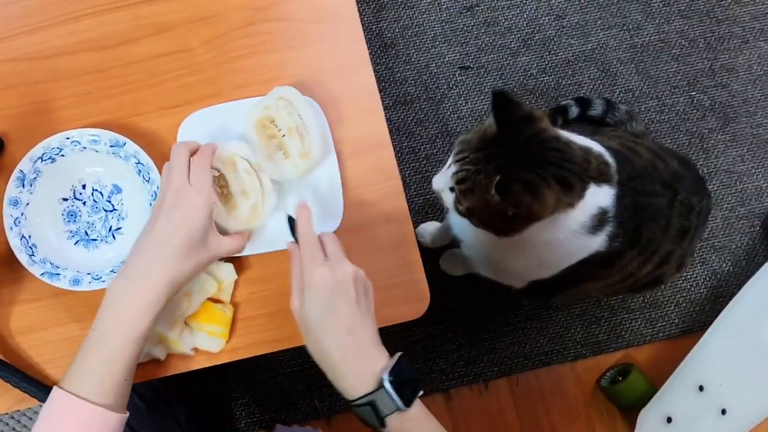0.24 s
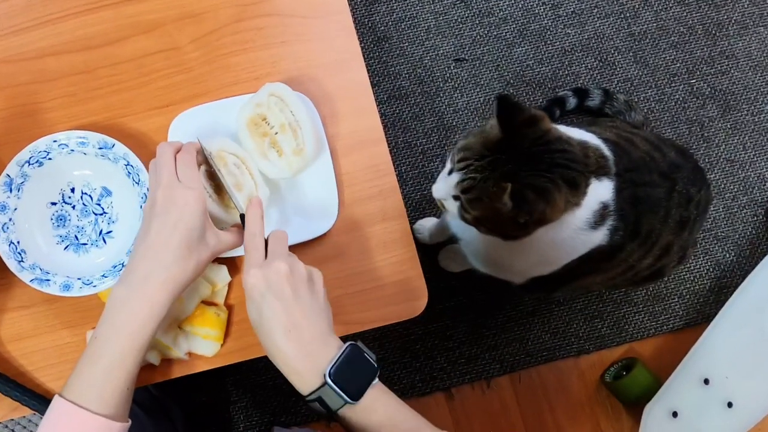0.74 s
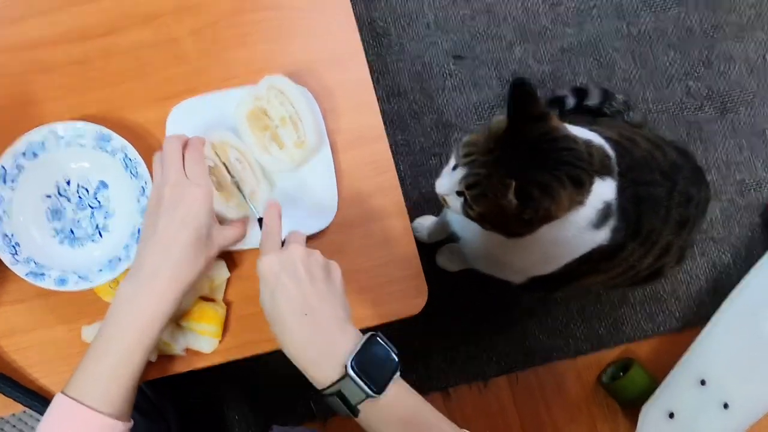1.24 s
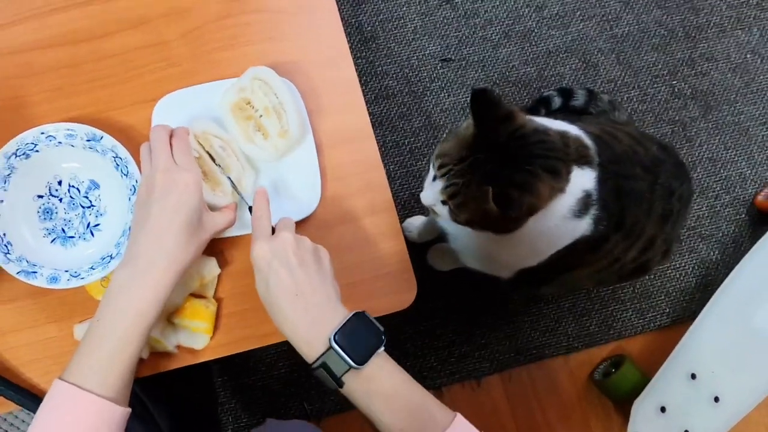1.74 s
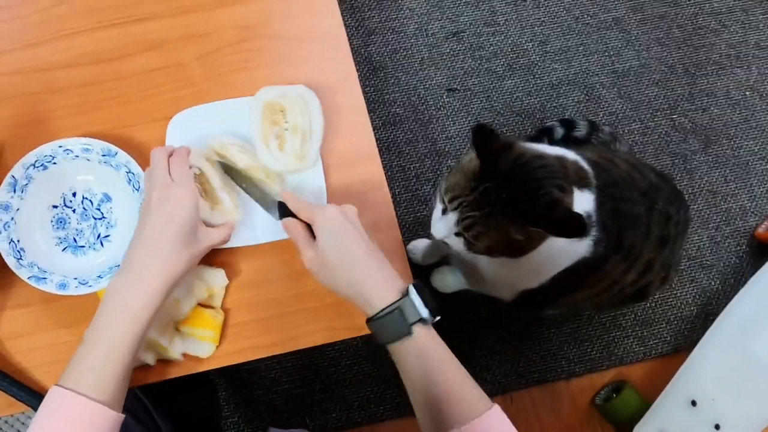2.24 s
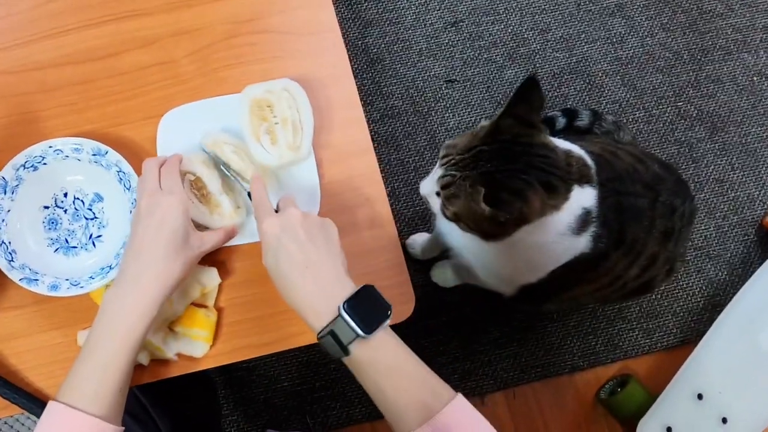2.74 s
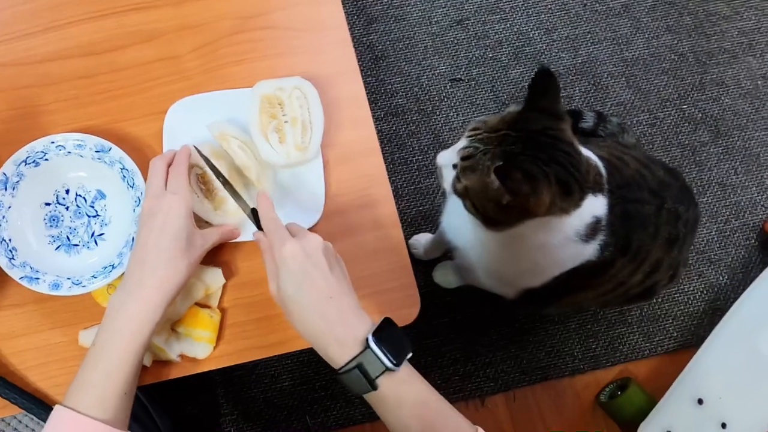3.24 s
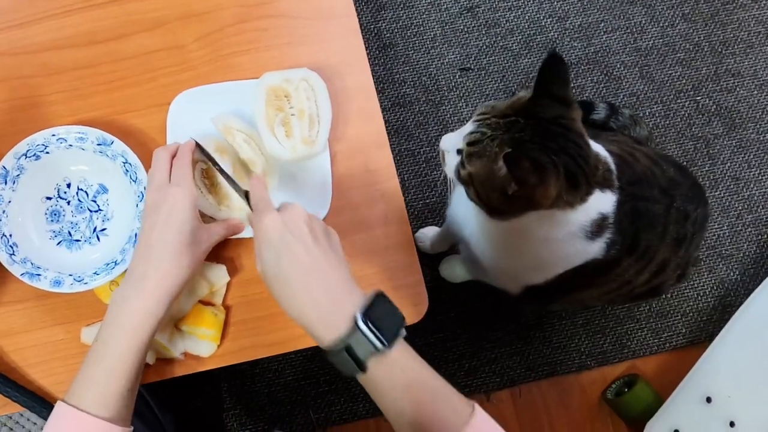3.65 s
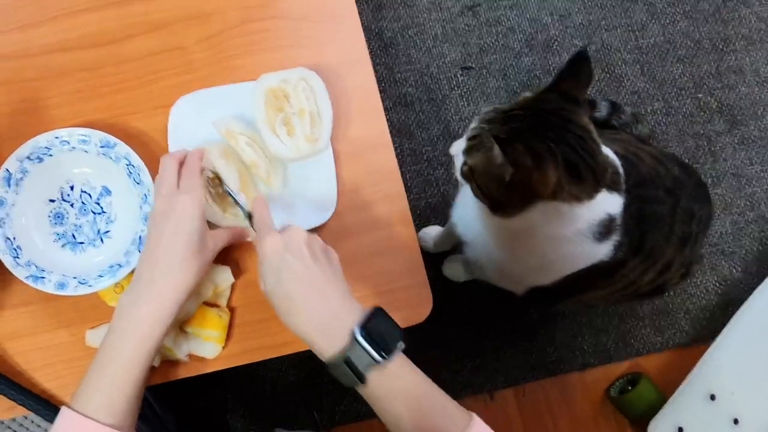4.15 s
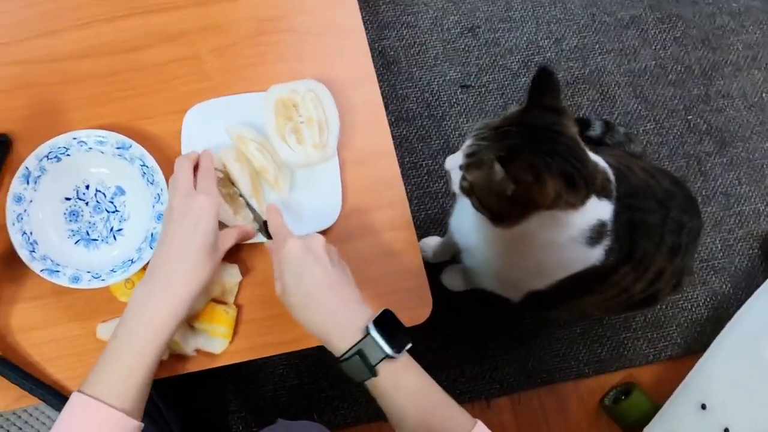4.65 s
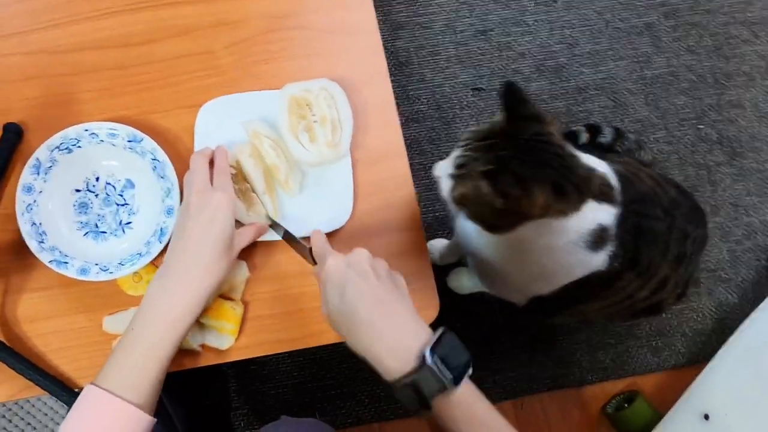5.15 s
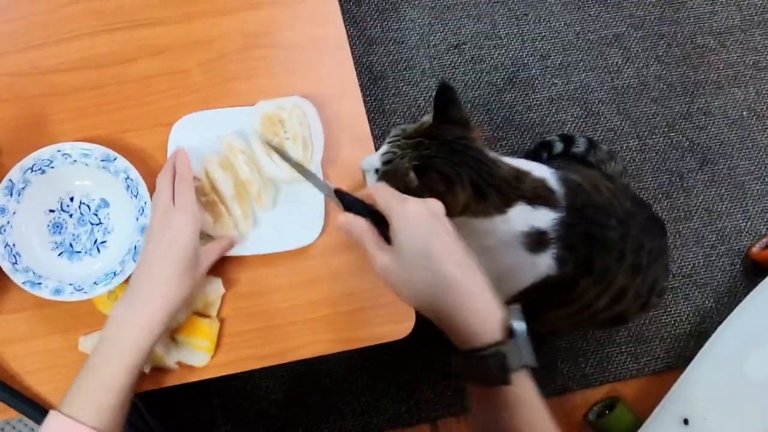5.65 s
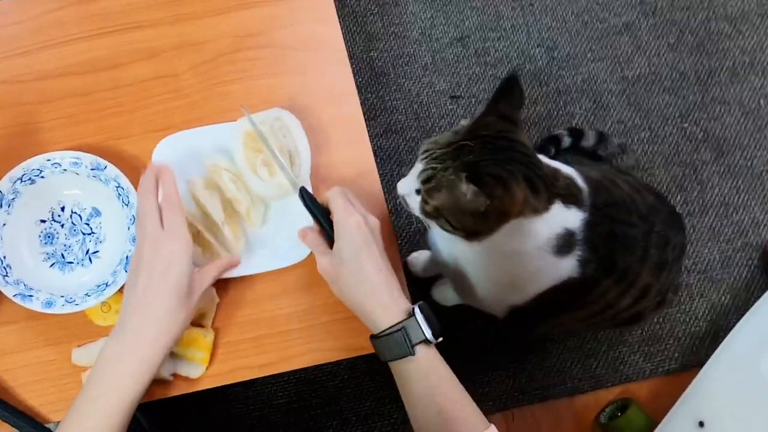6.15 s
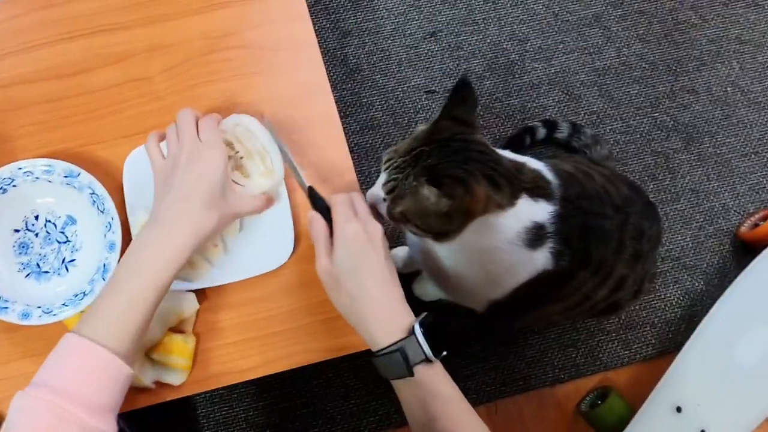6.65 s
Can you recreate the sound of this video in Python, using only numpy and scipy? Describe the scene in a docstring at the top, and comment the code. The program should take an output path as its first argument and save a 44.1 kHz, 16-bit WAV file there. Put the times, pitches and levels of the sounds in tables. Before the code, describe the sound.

A knife crunches wetly through crisp melon on a ceramic plate in a small living room, with sharp knocks, dull thuds and a final plate scrape.

```python
"""Over a faint room rumble, soft thuds on a ceramic plate, then a knife slicing a melon in a small living room.
The blade crackles through crisp flesh (random clicks ringing its resonances, with hiss), the flesh ticks wetly,
and the edge knocks on the plate (shaped noise, plate modes, short clinks); slices fall, slide and rock, and the
plate thuds on the wooden table (soft blows). Last, it is nudged round: stick-slip clicks and a thin squeal.
A phone above the table hears all this in stereo, with a short diffuse room tail."""
import sys
import numpy as np
from scipy import signal
from scipy.fft import rfft, irfft
from scipy.io import wavfile
from scipy.ndimage import uniform_filter1d

SR = 44100
rng = np.random.default_rng(int(sys.argv[2]) if len(sys.argv) > 2 else 0)


def int16_out(signal):
    """Quantize to a 16-bit WAV file."""
    q = np.round(np.clip(np.atleast_2d(signal).T, -1, 1) * 32767)
    wavfile.write(sys.argv[1], SR, q.astype(np.int16))


N = 303840
T = np.arange(N) / SR

# Dull, wet spectrum of soft thuds and of the cutting's body. Each row: frequency in Hz, level in dB.
FLESH_SPECTRUM = [(70, -23.5), (150, 0.5), (190, -5.5), (280, 3.5), (325, -3), (370, 7.5), (520, -7.5),
                  (1000, -2), (1450, -0.5), (2200, -8), (4000, -41)]


def amp(db):
    """Decibels to gain."""
    return 10 ** (np.asarray(db) / 20)


def unit(x):
    """Scale to rms 1."""
    return x / np.sqrt(np.mean(x ** 2) + 1e-20)


def unit_attack(x):
    """Scale a hit to rms 1 over its first 12 ms."""
    return x / np.sqrt(np.mean(x[:int(.012 * SR)] ** 2))


def on_log_axis(hz, points):
    """Read (Hz, value) points on a logarithmic frequency axis."""
    f, v = np.transpose(points)
    return np.interp(np.log(np.maximum(hz, 1)), np.log(f), v)


def colour(x, points, size=2048):
    """Minimum-phase filter with the given (Hz, dB) spectrum, by folding its cepstrum."""
    level_db = on_log_axis(np.fft.rfftfreq(size, 1 / SR), points)
    cepstrum = irfft(np.log(amp(level_db)))
    cepstrum[1:size // 2] *= 2
    cepstrum[size // 2 + 1:] = 0
    impulse = irfft(np.exp(rfft(cepstrum)))
    return signal.fftconvolve(x, impulse)[:len(x)]


def band(x, lo_hz, hi_hz, order=3):
    """Butterworth band-pass."""
    edges_hz = [lo_hz, min(hi_hz, .49 * SR)]
    return signal.sosfilt(signal.butter(order, edges_hz, "band", fs=SR, output="sos"), x)


def even(x, bins=160):
    """Level out the broad humps in the spectrum of a short burst."""
    spectrum = rfft(x)
    return irfft(spectrum / np.sqrt(uniform_filter1d(np.abs(spectrum) ** 2, bins)), len(x))


def add(track, start_s, x):
    """Mix a sound in at a start time."""
    i = int(start_s * SR)
    track[i:i + len(x)] += x[:N - i]


def flicker(per_s, depth_db):
    """Gain wandering between random dB values, per_s of them a second, depth_db their standard deviation."""
    steps = rng.standard_normal(N // 50)
    return amp(depth_db * np.interp(T * per_s, np.arange(len(steps)), steps))


def grains(per_s, spread_db):
    """Random one-sample clicks of either sign and very unequal size."""
    sizes = amp(spread_db * np.minimum(rng.exponential(size=N), 4))
    present = rng.random(N) < per_s / SR
    return present * sizes * rng.choice([-1, 1], N)


def gesture(start_s, length_s, swell_db, attack_db_per_s, release_db_per_s):
    """Gain of one movement: it sets in, swells or eases while it lasts, and dies away."""
    progress = np.clip((T - start_s) / length_s, 0, 1)
    early_s = np.maximum(start_s - T, 0)
    late_s = np.maximum(T - start_s - length_s, 0)
    level_db = swell_db * (progress - .5) - attack_db_per_s * early_s - release_db_per_s * late_s
    return amp(np.maximum(level_db, -120))


def ring(t, damping, scatter_db):
    """Decaying modes of plate and table top, detuned and rescaled at random for each contact."""
    # Each row: nominal frequency in Hz, mean level in dB, t60 in s at damping 1.
    modes = [(163.8, -17, 0.23), (238, -11.5, 0.48), (291, 0, 0.23), (376, -8.5, 0.096), (379.4, 2, 0.24),
             (483, -12.5, 0.43), (602, -10.5, 0.26), (617, -11, 0.1), (664, -13.5, 0.29), (775, -9, 0.35),
             (899, -4, 0.23), (1017, -4.5, 0.26), (1078, -11, 0.1), (1205, -3, 0.16), (1340, -12, 0.044),
             (1910, -7, 0.095), (2160, -4.5, 0.048), (2560, -6, .04), (2990, -7, 0.14), (3620, -4, 0.035),
             (4000, -7, 0.022), (4780, -8, 0.092), (7050, -12, 0.067)]
    hz, db, t60_s = np.transpose(modes)[:, :, None]
    size, detune, phase = rng.standard_normal((3, len(modes), 1))
    decay = np.exp(-np.log(1000) * t * damping / t60_s)
    tones = np.sin(2 * np.pi * hz * (1 + 0.015 * detune) * t + .5 * phase)
    return np.sum(amp(db + scatter_db * size) * decay * tones, axis=0)


def rumble():
    """Low, steady noise of the home; its bass wavers and is nearly alike at both ports."""
    # Each row: frequency in Hz, level in dB.
    spectrum = [(20, -16), (40, -9.5), (47, -3.5), (56, 2), (65, -6.5), (80, -22.5), (118, -14),
                (200, -15.5), (250, -16.5), (290, -11), (335, -21.5), (800, -28.5), (1300, -25),
                (2200, -38), (4500, -44.5), (7500, -48), (15000, -71)]
    mid, side = (unit(colour(rng.standard_normal(N), spectrum, size=16384)) for _ in range(2))
    side = colour(side, [(100, -15), (400, -10), (1500, -5), (5000, -2)])
    both = mid + side * np.array([[1], [-1]])
    bass = signal.sosfiltfilt(signal.butter(2, 150, fs=SR, output="sos"), both)
    wavering = bass * flicker(per_s=17, depth_db=0.7) + (both - bass) * flicker(per_s=6, depth_db=0.85)
    balance_db = np.array([[-.5], [.5]])
    return amp(-63.5) * wavering * amp(balance_db)


def soft_thuds():
    """Soft blows push for longer, so mostly low modes answer; repeated blows come ever duller and softer."""
    # Soft thuds: fruit landing on the plate, or the plate pushed against the table under the knife.
    # Each row: start in s, first peak in dB, first brightness in dB, number of blows.
    thuds = [(0.179, -47.5, -10, 1), (0.1957, -36.5, -4.5, 1), (0.2133, -34, -16.5, 2),
             (0.285, -50.5, -9, 1), (2.1107, -28.5, 7, 6), (2.769, -30, -4.5, 1), (4.024, -23.5, 2.5, 1),
             (4.407, -35.5, -1.5, 1), (5.131, -28.5, -19, 1), (5.167, -36, -14, 1), (5.2139, -40.5, -27, 1),
             (5.432, -43.5, -23, 1), (5.546, -53.5, -32, 1), (5.744, -46.5, -13, 2), (5.988, -39.5, -13, 1)]
    gap_s, settle_db, dulling_db_per_blow = .0192, 16.5, 7
    out = np.zeros(N)
    t = np.arange(SR // 4) / SR
    for start_s, peak_db, first_bright_db, blows in thuds:
        for k in range(round(blows)):
            bright_db = first_bright_db - dulling_db_per_blow * k
            settled = (k / round(blows)) ** 3
            slap = colour(rng.standard_normal(len(t)) * np.exp(-t / .011), FLESH_SPECTRUM)
            blow = ring(t, damping=1.6, scatter_db=4.0) + amp(18) * slap
            blow = colour(blow, [(100, -10), (290, 8.5), (700, bright_db + 5), (1400, bright_db + 4.5),
                                 (2600, bright_db - 12.5), (8000, bright_db - 20.5)])
            blow = blow / np.abs(blow).max()
            add(out, start_s + k * gap_s, blow * amp(peak_db - settle_db * settled))
    return out


def effort():
    """Gains of crunch, fizz and body: the powers of all movements and bites summed."""
    # Blade through flesh, or a cut slice falling or sliding. Each row: start in s, length in s,
    # crunch in dB, swell over the movement in dB, fizz in dB re crunch, body in dB re crunch.
    movements = [(0.66, .06, -74.5, -8, -3.5, -24), (0.914, .125, -48.5, -13, -9.5, -11),
                 (1.103, .03, -62.5, -1, -5, -2), (1.182, 0.06, -56.5, 14, -8, -3.5),
                 (1.29, .07, -56, -6, -3.5, 1), (1.387, .31, -64, -1, -5.5, -1.5),
                 (1.764, .018, -54, 12, -13, -8), (1.945, .1, -55, 16.5, -4, -12),
                 (2.076, .085, -57.5, 16.5, -14, 8), (2.242, .19, -72.5, -3, -13, 7.5),
                 (2.705, 0.0082, -61.5, 7, -2.5, -6), (3.052, .05, -69, 3.5, -18.5, 9),
                 (3.673, .07, -51, -2, -6, -3), (3.836, .075, -67, 2, -4, -1.5),
                 (3.971, .041, -46.5, 2.5, -5.5, -3.5), (4.145, .04, -67.5, 0, -3, -4.5),
                 (4.319, .073, -56.5, 21.5, -6.5, -1.5), (4.502, .12, -68, -5, -7, -2),
                 (4.7, .13, -65.5, 7.5, -2.5, -3.5), (5.042, .07, -55, -4, -8, -4.5),
                 (5.166, .04, -58.5, -11, -4, -13), (5.37, .06, -75, -9.5, -4.5, 6.5)]
    # The edge snaps through a tougher spot. Each row: start in s, crunch in dB.
    bites = [(.879, -47.5), (1.023, -47.5), (1.222, -48.5), (1.232, -47), (2.69, -58.5), (3.631, -47.5),
             (3.955, -56)]
    bite_s, bite_fizz_db, bite_body_db = 0.0045, -5.5, -7
    power = np.zeros((3, N))
    for start_s, length_s, db, swell_db, fizz_db, body_db in movements:
        movement = gesture(start_s, length_s, swell_db, attack_db_per_s=650.5, release_db_per_s=402.5)
        power += np.outer(amp([db, db + fizz_db, db + body_db]), movement) ** 2
    for start_s, db in bites:
        bite = gesture(start_s, bite_s, 0, attack_db_per_s=3500, release_db_per_s=900)
        power += np.outer(amp([db, db + bite_fizz_db, db + bite_body_db]), bite) ** 2
    return np.sqrt(power)


def cutting_and_slices():
    """Cells burst in clusters under the edge: clicks ring the blade, fizz, and sound dully through fruit and plate.

    Slices that fall or slide sound by the same mix of crunch, fizz and body.
    """
    # Damped blade resonances. Each row: frequency in Hz, width in Hz, level in dB.
    resonances = [(2170, 420, -2.5), (2920, 890, -0.5), (3440, 1600, -2.5), (6430, 3200, -11.5)]
    # Each row: frequency in Hz, level in dB.
    fizz_spectrum = [(3000, -24), (5200, 3), (6400, 4.5), (7500, 0), (8700, -7.5), (10000, -16.5),
                     (13000, -20.5), (15500, -45.5)]
    crunch_gain, fizz_gain, body_gain = effort()
    clicks = unit(grains(per_s=2200, spread_db=3.6)) * flicker(per_s=200, depth_db=2.4)
    blade = np.zeros(N)
    for k, (hz, width_hz, db) in enumerate(resonances):
        resonance = unit(signal.lfilter(*signal.iirpeak(hz, hz / width_hz, fs=SR), clicks))
        # the flesh grips the blade in changing places, so its resonances take turns
        blade += amp(db) * flicker(per_s=25, depth_db=2.0) * resonance * (-1) ** k
    blade = colour(blade, [(600, -14.5), (1500, -2.5), (2100, -0.5), (7000, 1.5), (9500, -9),
                           (13000, -13.5), (15500, -33.5)])
    # juice and the blade's flat side add a smoother hiss
    wet = clicks + rng.standard_normal(N)
    fizz = fizz_gain * unit(colour(wet, fizz_spectrum))
    body = body_gain * unit(colour(wet, FLESH_SPECTRUM))
    return amp(-1.0) * crunch_gain * unit(blade) + fizz + body


def ticks():
    """Films of juice snap as the flesh parts from the blade: noise bursts dying within milliseconds."""
    # Each row: start in s, peak in dB.
    snaps = [(0.668, -61.5), (0.7614, -65.5), (2.2114, -58), (2.294, -53.5), (2.402, -51), (2.4191, -53),
             (3.5325, -61.5), (5.212, -49), (5.3894, -64), (5.471, -60)]
    out = np.zeros(N)
    t = np.arange(SR // 20) / SR
    for start_s, peak_db in snaps:
        burst = rng.standard_normal(len(t)) * np.exp(-t / 0.0031)
        snap = colour(burst, [(500, -20), (2500, -2), (7000, 0.5), (12500, -17.5), (15500, -36)])
        add(out, start_s, snap / np.abs(snap).max() * amp(peak_db))
    return out


def knocks():
    """The edge breaks through and chatters on the glaze for a few ms; the fruit damps the ring. Returns direct, feed."""
    # Blade meets plate. Each row: start in s, level in dB, bass in dB, treble in dB, clink in Hz,
    # second clink in Hz, clink share in dB, room share in dB.
    contacts = [(1.792, -27, -1, 0.5, 2760, 4150, 5, -12), (2.0271, -51, 3, 4, 4150, 2960, 3.5, -1.5),
                (2.053, -37, -23.5, 2, 1970, 3940, -3.5, -19), (2.0577, -42.5, 3, 2, 3760, 4470, 3.5, -29),
                (2.072, -40.5, -4, 3, 6840, 4110, 0, -17.5), (2.7634, -29, 4, 0.5, 3143, 2430, -3, -15),
                (4.0179, -26.5, 6.5, -3, 1110, 880, -1.5, -16),
                (4.4008, -26.5, 0.5, -2.5, 3800, 4600, 2, -13),
                (5.0289, -41, 7.5, -1.5, 2580, 3630, -4, -11.5),
                (5.1241, -22.5, -15.5, -10, 1105, 3130, -17, -16),
                (5.1599, -36.5, -6, -9.5, 1110, 2980, -5, -25), (5.3536, -59, 10, -7, 1134, 2000, 0, -5.5),
                (5.4312, -61.5, 20, -9.5, 1200, 2000, -8, -30),
                (5.9824, -48.5, 0, -12, 1622, 2400, -2.5, -14)]
    # Each row: frequency in Hz, level in dB.
    crack_spectrum = [(70, -30), (150, -7.5), (330, 5), (540, -4.5), (900, -3), (1150, 2.5), (1550, -9),
                      (2200, 1), (2800, 2), (3250, -2.5), (3900, -1), (6000, -4.5), (7400, -1), (8600, -18),
                      (9500, -12), (11000, -24), (13500, -27), (16000, -45)]
    clink_decay_s, second_clink_db, ring_db, clink_room_db = 0.0016, -3, -16, -13
    out, feed = np.zeros((2, N))
    t = np.arange(SR // 3) / SR
    for start_s, level_db, bass_db, treble_db, clink_hz, second_hz, clink_db, room_db in contacts:
        contact = (1 - np.exp(-t / .0003)) * (np.exp(-t / 0.00086) + 0.099 * np.exp(-t / 0.01))
        # the second half is dropped: levelling spreads the burst round the block
        chatter = even(rng.standard_normal(len(t)) * contact) * (t < t[-1] / 2)
        hit = unit_attack(colour(chatter, crack_spectrum))
        hit = hit + amp(ring_db) * ring(t, damping=1.05, scatter_db=2)
        # weight behind the blade brings out the bass, bare steel on glaze the treble
        tilt = [(300, bass_db), (1800, 0), (7000, treble_db), (14000, 2 * treble_db)]
        hit = colour(band(hit, 160, 18000, order=2), tilt)
        # the two resonances that the point of contact favours die at once under the blade
        clink = np.sin(2 * np.pi * clink_hz * t) + amp(second_clink_db) * np.sin(2 * np.pi * second_hz * t)
        clink = unit_attack(clink * (1 - np.exp(-t / 0.00012)) * np.exp(-t / clink_decay_s))
        add(out, start_s, amp(level_db) * (hit + amp(clink_db) * clink))
        # the walls hear every side of the plate, so the clink stands out less in the room
        lo_hz, hi_hz = sorted((clink_hz, second_hz))
        lift_db = 10 * np.log10(1 + amp(clink_db) ** 2)
        spread = colour(hit, [(lo_hz / 1.8, 0), (lo_hz / 1.15, lift_db), (hi_hz * 1.2, lift_db), (hi_hz * 1.5, 0)])
        add(feed, start_s, amp(level_db + room_db) * (spread + amp(clink_db + clink_room_db) * clink))
    return out, feed


def sliding():
    """The plate's foot ring sticks and slips over the table top, and squeals thinly for a moment during one push."""
    # Plate over table. Each row: start in s, length in s, level in dB, swell over the push in dB.
    pushes = [(5.952, 0.055, -60.5, 4), (6.065, 0.1164, -47.5, -0.5), (6.43, .17, -66.5, 5.5),
              (6.635, 0.1, -57, 4), (6.733, .055, -46.5, 7.5), (6.873, .02, -62.5, 0)]
    # Stick-slip spectrum. Each row: frequency in Hz, level in dB.
    rub_spectrum = [(100, -16.5), (220, -6.5), (300, 3.5), (368, 13), (480, -6.5), (800, -3), (1220, 0.5),
                    (1900, -8), (3600, -15), (7000, -25), (9000, -40), (15000, -66.5)]
    # Squeal partials. Each row: mean frequency in Hz, mean level in dB.
    partials = [(8450, -72), (10050, -75), (11000, -80), (12050, -90), (13050, -89)]
    squeal_middle_s, squeal_spread_s = 6.12, .016
    slips = unit(colour(grains(per_s=2700, spread_db=-3), rub_spectrum))
    wavering_time_s = np.cumsum(flicker(per_s=400, depth_db=0.12)) / SR
    squeal = sum(amp(db) * np.sin(2 * np.pi * hz * wavering_time_s) for hz, db in partials)
    squeal = squeal * flicker(per_s=250, depth_db=3)
    squeal = squeal * np.exp(-((T - squeal_middle_s) / squeal_spread_s) ** 2)
    power = np.zeros(N)
    for start_s, length_s, db, swell_db in pushes:
        push = gesture(start_s, length_s, swell_db, attack_db_per_s=378, release_db_per_s=348.5)
        power += (amp(db) * push) ** 2
    catching = flicker(per_s=120, depth_db=1.6)
    return slips * catching * np.sqrt(power) + squeal


def room(x):
    """Walls answer after a few ms with a short diffuse tail, wider in the treble."""
    # Each row: frequency in Hz, t60 in s.
    decay_times = [(150, 0.3), (400, 0.2), (1100, 0.44), (2800, 0.27), (7000, .25), (14000, .17)]
    t = np.arange(SR // 2) / SR
    edges_hz = 90 * 2 ** np.arange(0, 8, .5)
    tail = np.zeros((2, len(t)))
    for lo_hz, hi_hz in zip(edges_hz, edges_hz[1:]):
        hz = np.sqrt(lo_hz * hi_hz)
        mid, side = band(rng.standard_normal((2, len(t))), lo_hz, hi_hz)
        width = amp(on_log_axis(hz, [(300, -9.0), (1200, -8.0), (4000, -2.0), (9000, 0.5)]))
        gain = amp(on_log_axis(hz, [(150, -1), (400, 0.93), (1000, -0.33), (2800, -0.45), (7000, -1), (12000, -1)]))
        decay = np.exp(-np.log(1000) * t / on_log_axis(hz, decay_times))
        tail += gain * (mid + width * side * np.array([[1], [-1]])) * decay
    tail *= 1 - np.exp(-(t / 0.017) ** 2)
    tail /= np.sqrt(np.sum(tail.mean(axis=0) ** 2))
    return signal.fftconvolve(x[None], tail, axes=1)[:, :N]


def ports(x):
    """The plate lies a little nearer the right port; the phone's body shades and delays the left one."""
    hz = np.fft.rfftfreq(N, 1 / SR)
    shade_db = on_log_axis(hz, [(100, -2.5), (300, -1.0), (600, -2.4), (1200, -2.5), (2400, -0.5),
                                (4400, -2.5), (8000, -7.0)])
    lag_rad = np.interp(hz, [0, 3500, 7000, 9000], [0.14, .75, 1.25, 1.5])
    # half the difference goes to each port
    half = amp(shade_db / 2) * np.exp(-.5j * lag_rad)
    return irfft(rfft(x) * np.array([half, 1 / half]), N)


def scene():
    """Direct sounds from the plate reach both ports; their feeds excite the room, over the rumble."""
    background = rumble()
    soft = soft_thuds()
    flesh = cutting_and_slices() + ticks()
    hits, hit_feed = knocks()
    slide = sliding()
    feed = hit_feed + amp(-12.5) * flesh + amp(-14.5) * soft + amp(-12) * slide
    return ports(hits + flesh + soft + slide) + room(feed) + background


def record(dry):
    """The phone cuts the top: steep elliptic low-pass."""
    top_hz = 15600
    return signal.sosfilt(signal.ellip(8, .2, 70, top_hz, fs=SR, output="sos"), dry)


dry = scene()
out = record(dry)
int16_out(out)
```